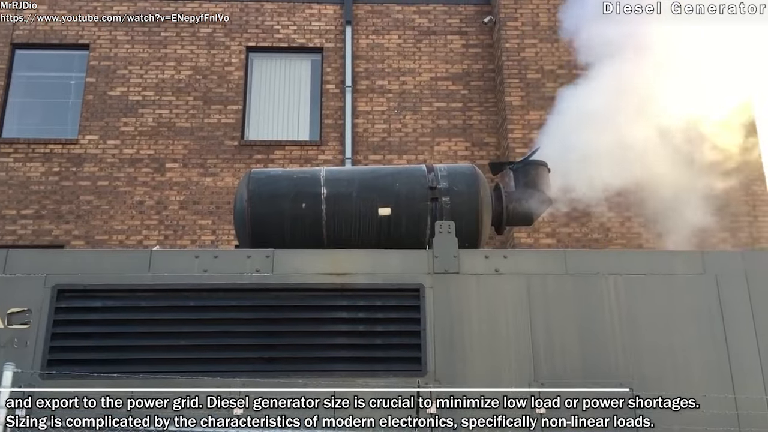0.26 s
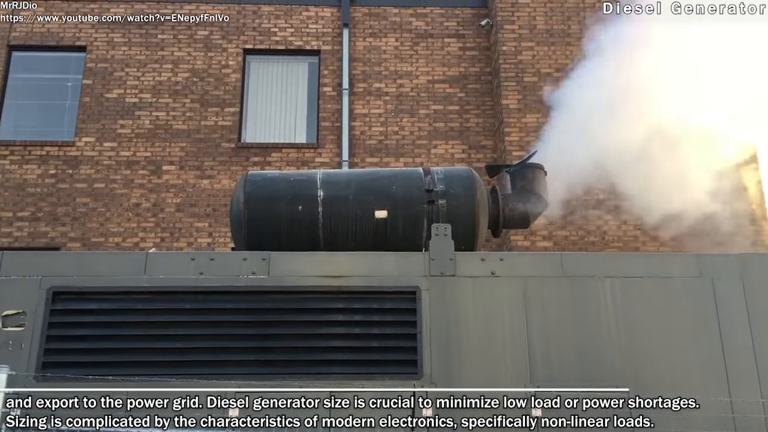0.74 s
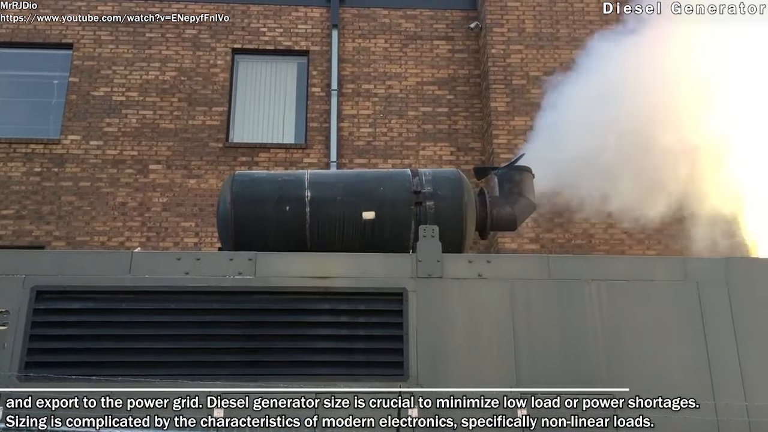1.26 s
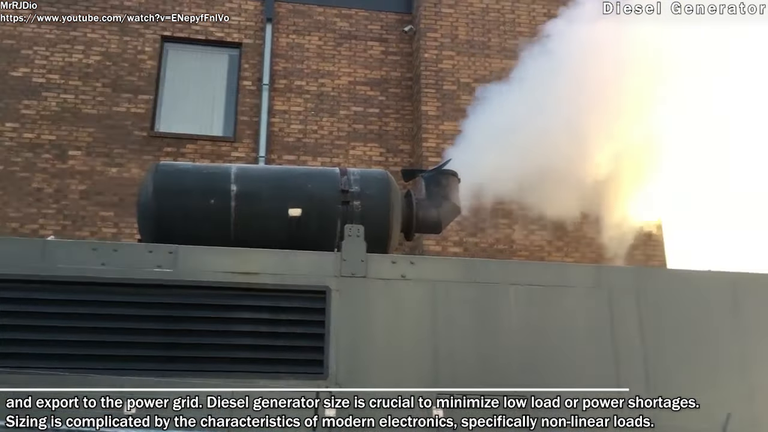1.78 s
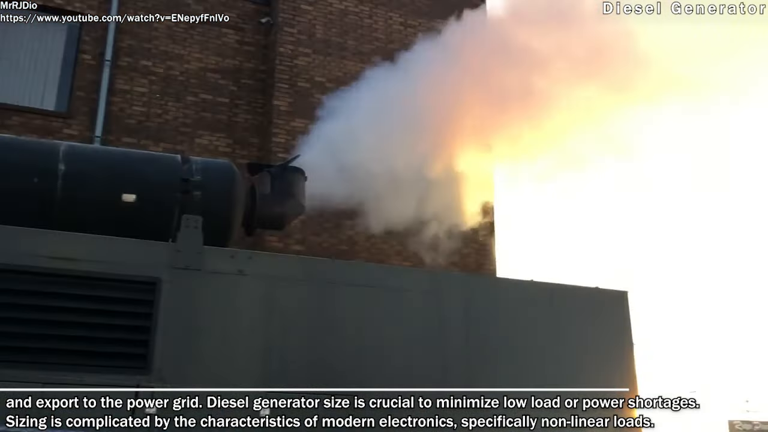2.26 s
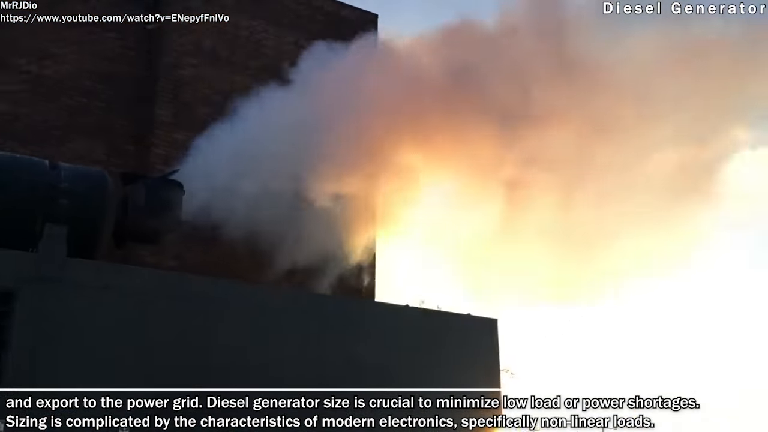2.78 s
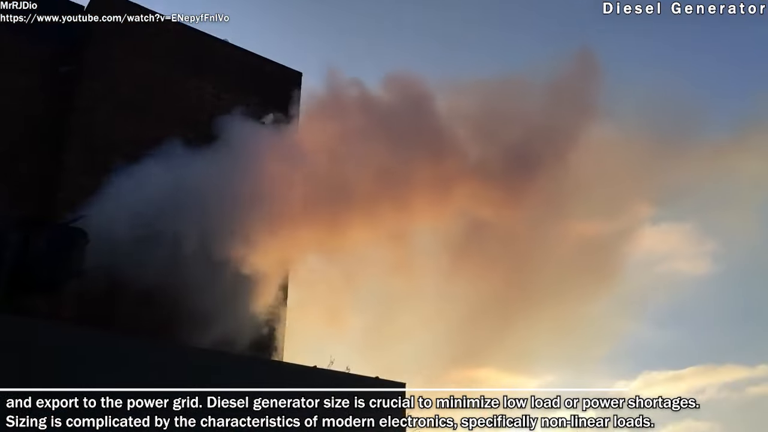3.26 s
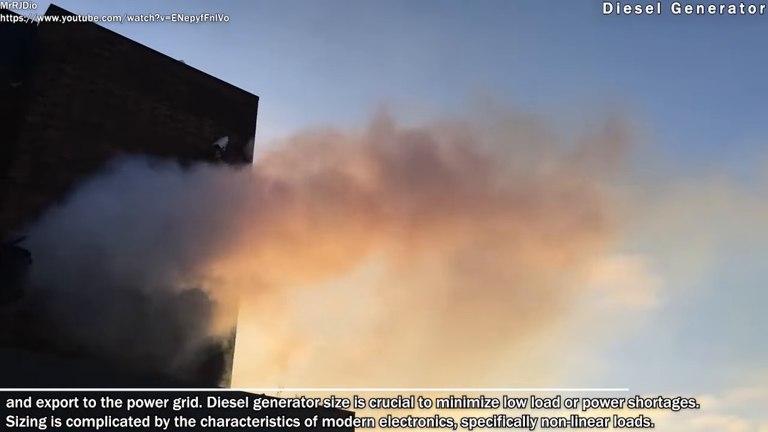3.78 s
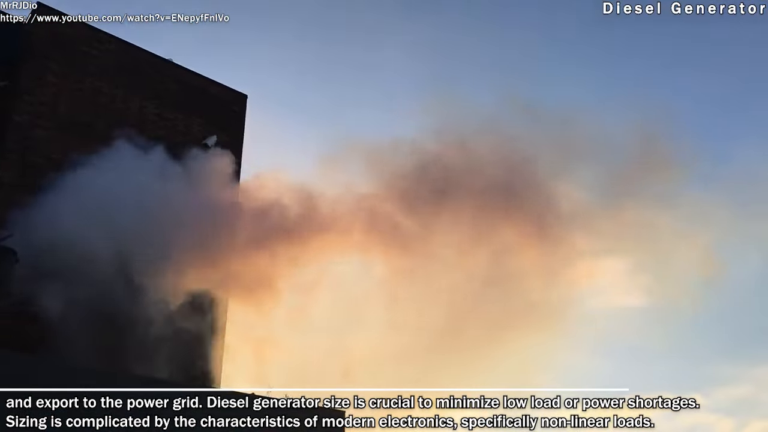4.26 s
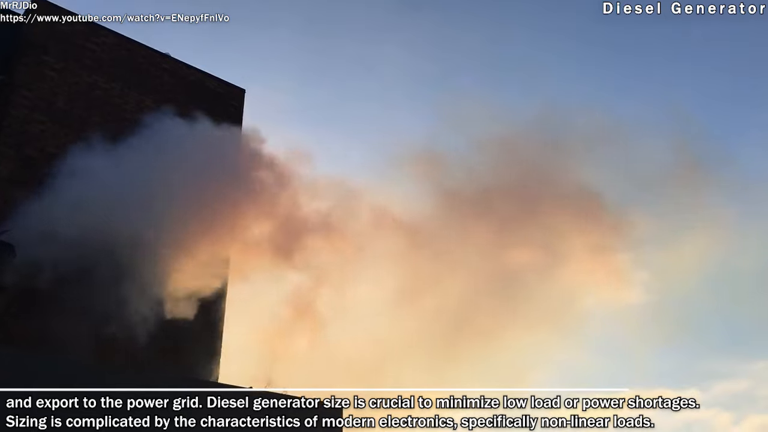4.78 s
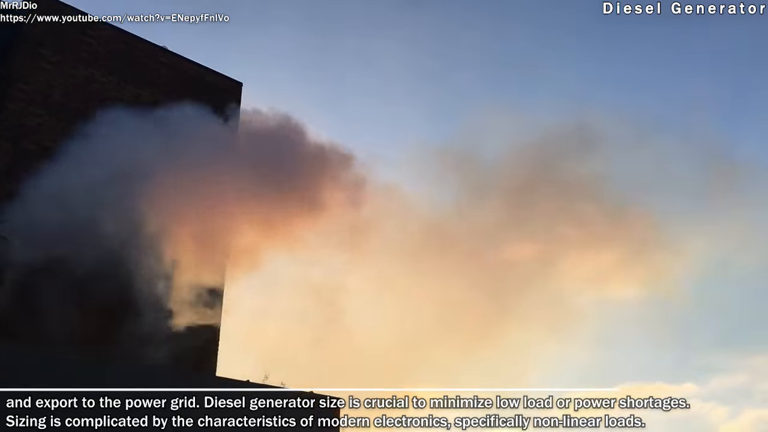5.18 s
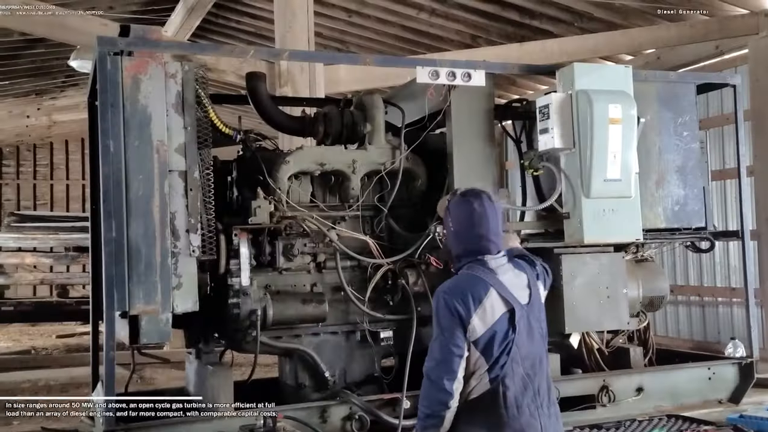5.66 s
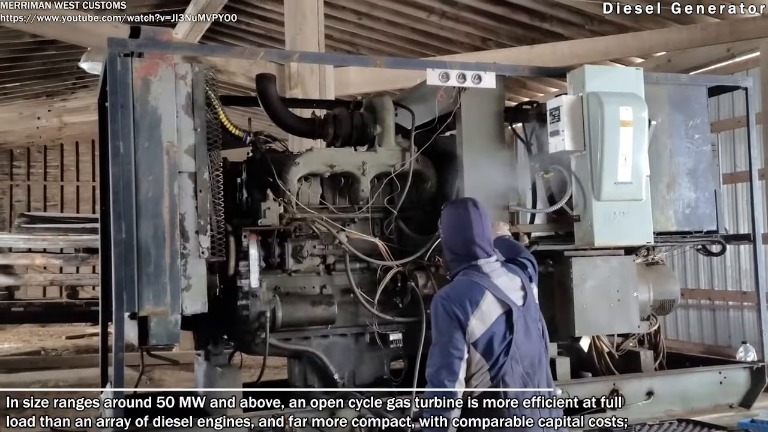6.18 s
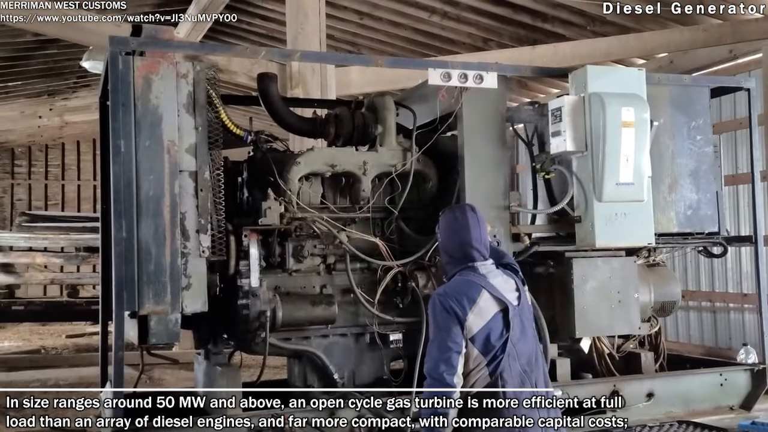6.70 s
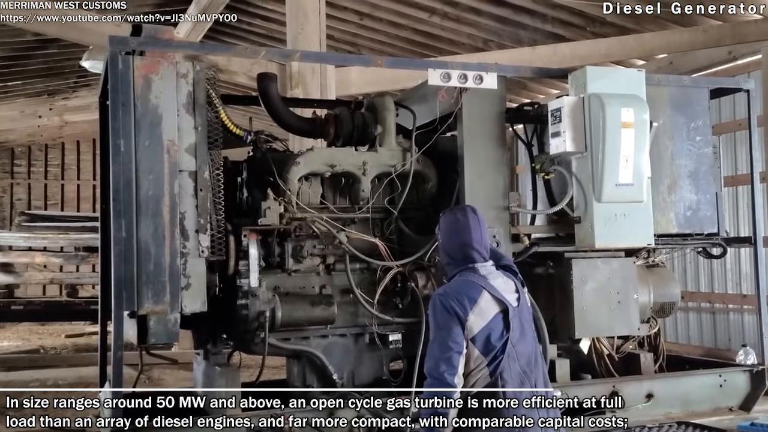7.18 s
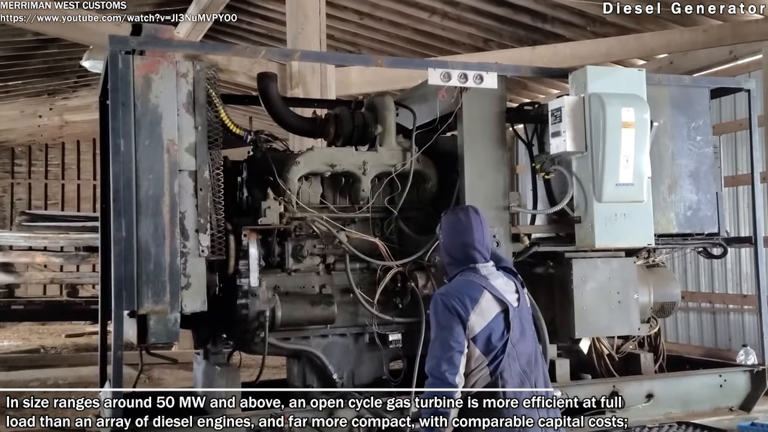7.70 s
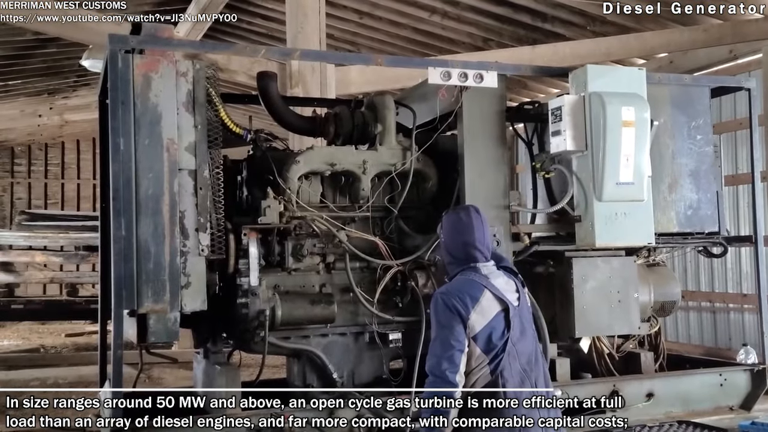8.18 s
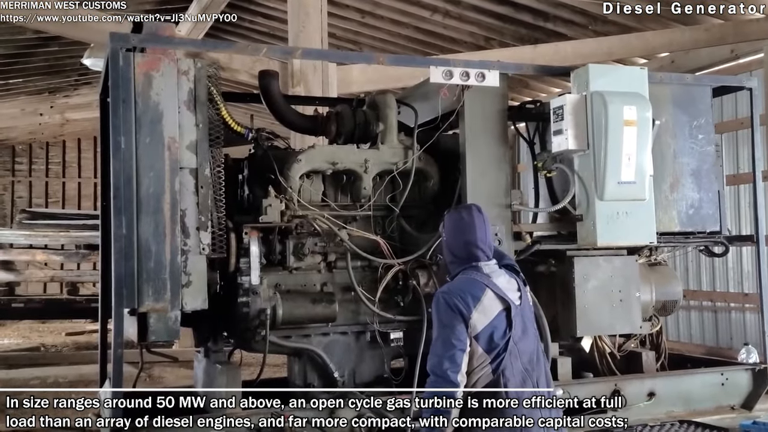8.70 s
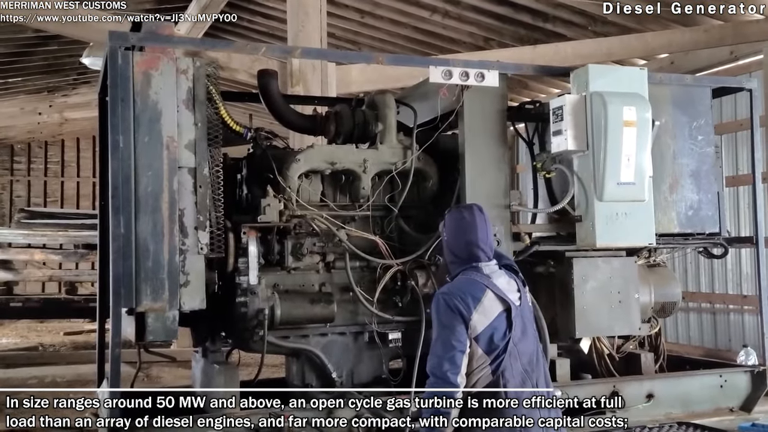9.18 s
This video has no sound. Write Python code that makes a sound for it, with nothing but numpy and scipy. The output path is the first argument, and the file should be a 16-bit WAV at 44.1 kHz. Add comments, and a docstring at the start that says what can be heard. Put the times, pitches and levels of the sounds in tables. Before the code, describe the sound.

Outdoors, a big diesel generator runs loud and steady, centred: a low hum pulsing about five times a second, rapid knocking, broad exhaust roar and light hiss. At about 5.6 seconds it cuts hard to a much quieter shed, heard almost wholly on the left. An engine idles some way off; a spray can puffs briefly, metal clinks, soft thuds, and finally a starter solenoid snaps and its gear clangs loudly.

```python
"""Generator in a yard, starter in a shed

A big diesel generator runs outdoors in mono: sines on its engine orders, a fan tone beating against one
order, a repeated knock pattern and filtered noise for the roar. A hard cut leads to a shed, on the left with
faint crosstalk on the right: an engine idles some way off, a noise jet sprays briefly, things clink and thud,
then a solenoid snaps and its pinion rings the flywheel as decaying modes."""
import sys
import numpy as np
from scipy import signal
from scipy.fft import rfft, irfft, next_fast_len
from scipy.io import wavfile
from scipy.ndimage import uniform_filter1d, map_coordinates

SR = 44100
rng = np.random.default_rng(int(sys.argv[2]) if len(sys.argv) > 2 else 0)


def inscribe(sig):
    """Save sig as 16-bit PCM at rate SR to the path in sys.argv[1].

    A 1-D sig is mono; a 2-D sig holds one channel per row.
    Samples are clipped to [-1, 1] before scaling.
    """
    pcm = np.round(np.clip(np.atleast_2d(sig).T, -1, 1) * 32767)
    wavfile.write(sys.argv[1], SR, pcm.astype(np.int16))


N = 416304
TIME = np.arange(N) / SR  # s

# Spectrum of the low murmur of the shed. Each row: frequency in Hz, relative density in dB per Hz.
MURMUR_SPECTRUM = [(14, -30), (30, -5), (70, -7.5), (140, -12.5), (185, -15), (235, -20.5), (280, -15.5),
                   (350, -21.5), (530, -30.5), (960, -43.5), (1300, -70), (2500, -120)]


def amp(db):
    """A level in decibels is twenty times the logarithm of the amplitude ratio returned here."""
    return 10 ** (np.asarray(db) / 20)


def unit(x):
    """Division by the root mean square brings a signal to rms 1."""
    return x / np.sqrt(np.mean(x ** 2) + 1e-20)


def wobble(rate):
    """Spline interpolation of random knots, rate a second, gives a slow, smooth fluctuation."""
    knots = rng.standard_normal(int(N * rate / SR) + 4)
    return map_coordinates(knots, [np.arange(N) * rate / SR])


def filtered(x, response):
    """Linear filtering multiplies the spectrum of x by a response of frequency in Hz."""
    size = next_fast_len(N + 8192)
    spectrum = rfft(x, size) * response(np.fft.rfftfreq(size, 1 / SR))
    return irfft(spectrum, size)[..., :N]


def coloured(x, spectrum):
    """A spectral envelope, linear in dB over log frequency, shapes x, which is returned at rms 1."""
    f, db = np.transpose(spectrum)
    return unit(filtered(x, lambda hz: amp(np.interp(np.log(hz + 1), np.log(f + 1), db))))


def rush(spectrum, patchy_db=0.):
    """Turbulence is broadband noise whose strength varies in patches of time and frequency."""
    cells = signal.stft(rng.standard_normal(N), nperseg=512)[2]
    patches = uniform_filter1d(rng.standard_normal(cells.shape), size=5, axis=0)
    patches = uniform_filter1d(patches, size=10, axis=1)
    noise = signal.istft(cells * amp(patchy_db * unit(patches)), nperseg=512)[1][:N]
    return coloured(noise, spectrum)


def tone(turns, db):
    """A rotating phase, counted in turns, gives a sine, here of rms level db."""
    return np.sqrt(2) * amp(db) * np.cos(2 * np.pi * turns)


def clatter(turns, spectrum, size):
    """A random pattern of size steps, repeated every cycle, has lines on all orders of the cycle."""
    pattern = rng.standard_normal(size)
    return coloured(pattern[(turns % 1 * size).astype(int)], spectrum)


def ramp(start_s, end_s):
    """A linear transition goes from 0 at its start to 1 at its end."""
    return np.clip((TIME - start_s) / (end_s - start_s), 0, 1)


def struck(start_s, rise_s, t60):
    """An impact rises fast and decays exponentially, by 60 dB in t60 seconds."""
    t = np.maximum(TIME - start_s, 0)
    return (1 - np.exp(-t / rise_s)) * amp(-60 * t / t60)


# Shed sources: their levels stand before the gain of two in scene().

def murmur():
    """Diffuse ambient sound is stationary noise, a low band here with a fainter treble band."""
    # Each row: frequency in Hz, relative density in dB per Hz.
    air_spectrum = [(410, -27), (700, -4), (1050, -6.5), (1300, -1.5), (1900, -13), (2500, -14.5),
                    (3100, -15.5), (6100, -31), (6600, -49), (8200, -48), (8700, -37), (12500, -43),
                    (13500, -60), (15800, -63)]
    low = amp(-45.5 + 0.77 * wobble(3.2)) * rush(MURMUR_SPECTRUM, patchy_db=0.5)
    return low + amp(-66.5 + 1.1 * wobble(5)) * rush(air_spectrum, patchy_db=1.3)


def spray():
    """A can's jet is turbulent noise; its treble peaks before its body."""
    # Each row: frequency in Hz, relative density in dB per Hz.
    jet_spectrum = [(900, -28), (1600, -5), (2250, -3), (2900, -17), (3500, -21), (3850, -12), (4300, -21),
                    (4800, -13), (5300, -19), (5800, -24), (6600, -42), (8300, -40), (9900, -24),
                    (15800, -34)]
    start_s, peak_s, treble_lead_s = 6.49, 6.67, 0.046
    peak_db, swell_db_per_s, fade_db_per_s = -62.5, 70, 100
    split_hz = 3800

    def split(hz):
        treble = 1 / (1 + (split_hz / (hz + 1)) ** 6)
        return np.array([1 - treble, treble])

    bands = filtered(rush(jet_spectrum, patchy_db=2.0), split)
    late = TIME - peak_s + np.array([[0], [treble_lead_s]])
    level_db = peak_db + np.minimum(swell_db_per_s * late, -fade_db_per_s * late)
    return ramp(start_s, start_s + .04) * (amp(level_db) * bands).sum(axis=0)


def clinks():
    """A small impact excites a dense set of resonances, heard as coloured noise that decays."""
    # Each row: start in seconds, level in dB before dulling, frequency in Hz above which it is dulled.
    hits = [(6.96, -60, 4000), (8.245, -59, 4000), (8.27, -61, 3000), (8.417, -51.5, 12000),
            (8.44, -58, 5000)]
    # Each row: frequency in Hz, relative density in dB per Hz.
    tin_spectrum = [(450, -30), (800, -14), (1370, -2), (2000, -8), (2340, -7), (2700, -13), (4300, -24),
                    (5200, -21), (6500, -40), (8300, -38), (10100, -26), (15000, -50)]
    tin = rush(tin_spectrum)
    out = np.zeros(N)
    for s, db, dull_hz in hits:
        dulled = filtered(tin, lambda hz: 1 / np.hypot(1, (hz / dull_hz) ** 2))
        out += amp(db) * struck(s, .003, t60=0.13) * dulled
    return out


def thuds():
    """A soft push gives the floor a short, heavily damped low pulse and makes a floorboard ring."""
    # Each row: start in seconds, gain of the low pulse in dB, gain of the board in dB.
    pushes = [(5.83, -39, -75), (6.962, -34, -56), (8.99, -42, -75), (9.291, -38, -75)]
    board_hz, board_t60_s = 760, .09
    out = np.zeros(N)
    for s, db, board_db in pushes:
        t = np.maximum(TIME - s, 0)
        pulse = t / 0.011 * np.exp(1 - t / 0.018)
        out += amp(db) * pulse * np.sin(2 * np.pi * 58 * t)
        out += amp(board_db) * struck(s, .002, board_t60_s) * np.sin(2 * np.pi * board_hz * t)
    return out


def idle_drone(turns):
    """Eight firings of uneven size per cycle sound as harmonics (orders) of the cycle rate."""
    # Each row: order of the cycle, rms level in dB at rest, rms level in dB with the throttle nudged.
    orders = [(7, -56, -59), (8, -42, -44.5), (10, -52, -50), (11, -53, -52), (13, -54, -54),
              (16, -41.5, -41), (18, -54, -49), (19, -37.5, -47), (21, -47.5, -44), (23, -52, -57),
              (24, -36, -43), (27, -52, -56), (29, -58, -55), (32, -55, -61), (35, -53.5, -60),
              (40, -64, -66), (47, -55.5, -59)]
    # Upper orders. Each row: frequency in Hz, relative density in dB per Hz.
    chug_spectrum = [(130, -42), (160, 3), (200, -14), (235, -10), (290, -1), (400, -16), (620, -19),
                     (1000, -40), (2000, -120)]
    throttle = ramp(8, 8.8)  # nudged open
    out = amp(-53) * clatter(turns, chug_spectrum, size=2000)
    for order, rest_db, open_db in orders:
        phase = order * turns + rng.random() + 0.0019 * order * wobble(5)
        level_db = rest_db + throttle * (open_db - rest_db) + 0.019 * order * wobble(3.5)
        out += tone(phase, level_db)
    return out


def valve_taps(turns):
    """Noise bursts locked to the shaft excite the resonances of the valve gear."""
    # Each row: place in the cycle from 0 to 1, length in cycles, level in dB.
    taps = [(0, .08, -3), (.15, .05, -8), (.29, .03, -7), (.43, .04, 0)]
    # Resonances, applied twice. Each row: frequency in Hz, width in Hz, level in dB per pass.
    rattle = [(1703, 190, -2.5), (2750, 180, -8.5)]
    gate = np.full(N, 0.43)  # noise between the taps
    for place, length, db in taps:
        distance = (turns - place + .5) % 1 - .5
        gate += amp(db) * np.exp(-(distance / length) ** 2)
    bursts = gate * amp(1.2 * wobble(14)) * rng.standard_normal(N)

    def ring(hz):
        return sum(amp(db) * 1j * hz * width / (centre ** 2 - hz ** 2 + 1j * hz * width)
                   for centre, width, db in rattle)

    return amp(-68.5) * unit(filtered(filtered(bursts, ring), ring))


def idler():
    """The shaft phase, the integral of the cycle rate, drives both the drone and the valve taps."""
    # Each row: time in seconds, engine cycles a second.
    idle_speed = [(5.6, 5.5), (5.8, 5.503), (6.1, 5.6), (6.6, 5.708), (7.0, 5.69), (7.7, 5.748),
                  (8.22, 5.685), (8.55, 5.92), (9.0, 5.81)]
    s, cycles_per_s = np.transpose(idle_speed)
    turns = np.cumsum(np.interp(TIME, s, cycles_per_s)) / SR
    turns -= turns[round(6.09 * SR)]  # a cycle starts, with a tap, at 6.09 s
    return idle_drone(turns) + valve_taps(turns)


def starter():
    """A snap and a whirr are noise bursts; the pinion's impacts excite decaying modes of teeth and housing."""
    # Pinion on ring gear. Each row: start in seconds, then levels in dB of tooth ring, housing, scrape
    # and crack.
    blows = [(9.412, -15, -40, -14.5, -30), (9.4257, -25, -11.5, -33, -31)]
    # Modes. Each row: frequency in Hz, relative level in dB, 60 dB decay time in seconds.
    teeth = [(2540, 3.5, 0.065), (1590, -4, 0.045), (2950, -5, 0.028), (6800, -5, 0.035)]
    housing = [(240, -4.5, .3), (366, 1.5, 0.31), (490, -4.5, .2), (786, -3, 0.11), (1024, -10, .15),
               (1430, -1.5, 0.13)]
    # Spectra. Each row: frequency in Hz, relative density in dB per Hz.
    whirr_spectrum = [(88, -53), (150, -26), (194, -8.5), (678, -7), (749, -13), (851, -20), (1010, -9.5),
                      (1660, -2.5), (2150, -6.5), (2940, -6.5), (4500, -30), (5850, -47), (9900, -120)]
    snap_spectrum = [(2350, -27), (4000, -3), (4670, -5), (6560, -6.5), (8020, -9), (11700, -7),
                     (15000, -11), (15800, -23)]
    snap_s = 9.3532  # the solenoid
    whirr = amp(-29) * ramp(snap_s, snap_s + 0.00085)
    treble = amp(-20.5) * struck(snap_s, 0.0008, t60=0.02)
    treble += amp(-38.5) * struck(snap_s, .004, t60=0.45)  # trailed by the motor
    out = np.zeros(N)
    for s, teeth_db, housing_db, scrape_db, crack_db in blows:
        whirr += amp(scrape_db) * struck(s, .003, t60=0.11)
        treble += amp(crack_db) * struck(s, .003, t60=0.095)
        t = np.arange(N - round(s * SR)) / SR
        for db, modes, rise_s in ((teeth_db, teeth, .004), (housing_db, housing, .003)):
            ring = np.zeros(len(t))
            for hz, level_db, t60 in modes:
                decay = amp(db + level_db - 60 * t / t60)
                ring += decay * np.sin(2 * np.pi * (hz * t + rng.random()))
            out[-len(t):] += (1 - np.exp(-t / rise_s)) * ring
    return out + whirr * rush(whirr_spectrum) + treble * rush(snap_spectrum)


def generator():
    """A governed engine radiates steady orders; a close fan tone beats with one at the difference frequency."""
    # Each row: order of the engine cycle, rms level in dB before the bass change.
    exhaust = [(3, -34), (5, -36), (6, -30.5), (7, -41.5), (9, -37.5), (10, -36.5), (11, -31), (12, -36.5),
               (14, -42), (15, -37), (16, -20.5), (17, -43), (18, -39), (19, -46), (22, -42.5), (24, -43.5),
               (27, -44.5), (28, -42.5), (34, -44.5), (42, -43), (45, -47.5), (60, -42.5), (65, -50),
               (66, -43.5), (72, -51.5), (74, -53), (76, -46.5), (81, -45.5), (120, -47.5), (123, -52)]
    # Each row: order of the blade rate, rms level in dB before the bass change.
    fan = [(1, -18.5), (2, -37), (3, -45)]
    # Spectra. Each row: frequency in Hz, relative density in dB per Hz.
    knock_spectrum = [(200, -40), (290, -10.5), (450, -8), (700, -7.5), (830, -18), (1000, -6), (1400, -20),
                      (1900, -5.5), (2400, -31), (3000, -50)]
    rumble_spectrum = [(15, -39), (28, -21.5), (40, -8.5), (60, -4), (90, -3), (125, -4.5), (170, -0.5),
                       (215, -1.5), (280, -12.5), (340, -45)]
    roar_spectrum = [(160, -34.5), (270, 1.5), (310, -4.5), (368, -2), (437, -9), (463, -8), (550, -9.5),
                     (692, -9.5), (822, -12.5), (966, -10), (1380, -13), (1860, -14.5), (2980, -13.5),
                     (3540, -23), (4200, -35), (5460, -57), (9240, -120)]
    hiss_spectrum = [(2120, -27), (3600, -10.5), (3970, -0.5), (4970, -2.5), (5520, 0.5), (6770, -0.5),
                     (7710, -4.5), (8830, -0.5), (10600, -11), (14000, -10), (15100, -25), (15800, -24.5)]
    cycle_hz, blade_hz = 15.0165, 235.12
    beat_order = 16  # about five beats a second with the blade tone
    out = np.zeros(N)
    for order, db in exhaust:
        if order == beat_order:  # starts in step with the fan, so the hum opens on a swell
            start, phase_depth, depth_db = 0, .01, .6
        else:
            start, phase_depth, depth_db = rng.random(), .03, 2.
        phase = order * cycle_hz * TIME + start + phase_depth * wobble(2.91)
        out += tone(phase, db + depth_db * wobble(2.484))
    for order, db in fan:
        phase = order * (blade_hz * TIME + 0.0085 * wobble(2.5))
        out += tone(phase, db + 0.26 * order * wobble(2.3))
    turn = ramp(1.15, 3.6)  # the microphone swings round once
    out += amp(-33.5 + 0.385 * wobble(1.4)) * clatter(cycle_hz * TIME, knock_spectrum, size=1500)
    out += amp(-21 + 0.24 * wobble(3.9)) * rush(rumble_spectrum, patchy_db=2.0)
    out += amp(-23.5 - 0.9 * turn + 0.23 * wobble(12)) * rush(roar_spectrum, patchy_db=1.)
    # the swing takes the bass from -1.9 to +0.4 dB
    bass = filtered(out, lambda hz: 1 / (1 + (hz / 115) ** 6))
    out += (amp(-1.9 + 2.3 * turn) - 1) * bass
    return out + amp(-38 - turn + 0.35 * wobble(11)) * rush(hiss_spectrum, patchy_db=1.1)


def scene():
    """Superposition adds the sources: yard, then shed, with faint, thin crosstalk on the shed's right."""
    cut_s = 5.5955
    yard = np.clip((cut_s - TIME) / 0.0013, 0, 1)
    near = starter()
    left = 2 * (idler() + murmur() + spray() + clinks() + thuds() + near)
    thin = filtered(np.roll(near, 40), lambda hz: hz / np.hypot(hz, 900))  # 40 samples late
    right = amp(-51) * left + amp(-17) * thin + amp(-80) * rush(MURMUR_SPECTRUM)
    return yard * generator() + (1 - yard) * np.array([left, right])


def record(dry):
    """Soft saturation rounds peaks just under full scale, then a low-pass limits the band."""
    top_hz = 15750
    soft = dry / (1 + np.abs(dry / .98) ** 8) ** (1 / 8)
    return filtered(soft, lambda hz: np.clip((top_hz - hz) / 150, 0, 1))


dry = scene()
out = record(dry)
inscribe(out)
```